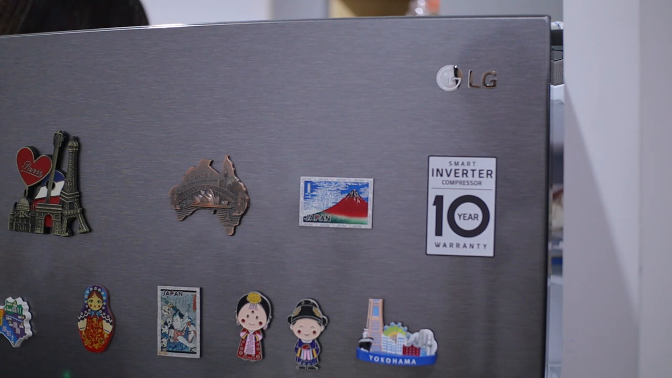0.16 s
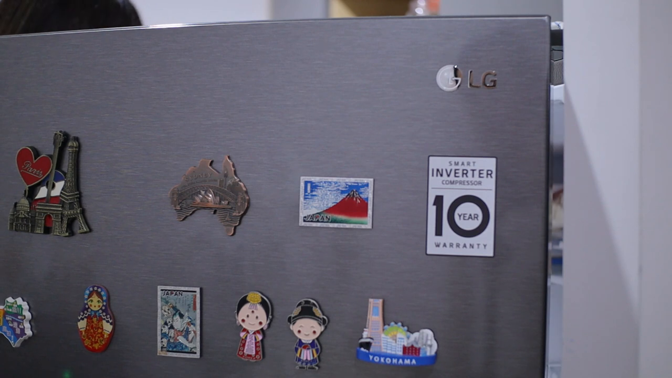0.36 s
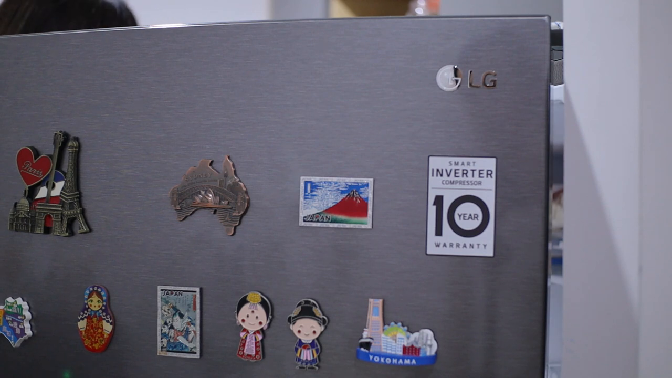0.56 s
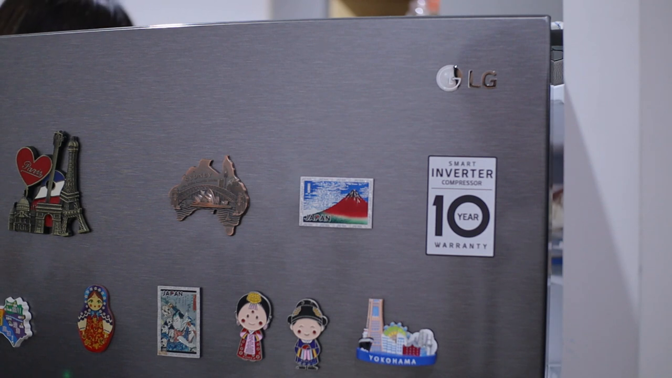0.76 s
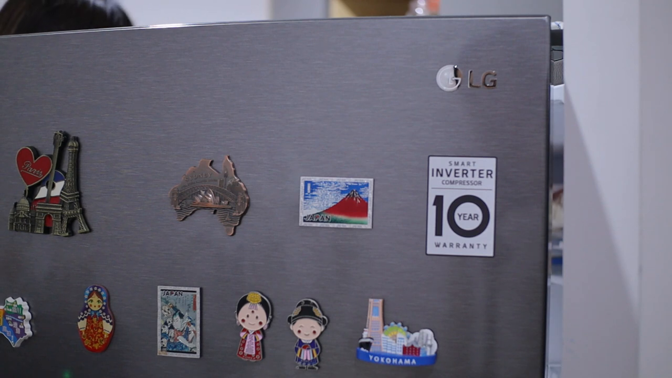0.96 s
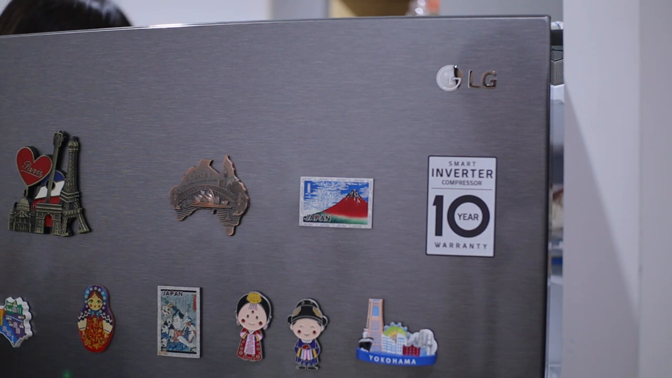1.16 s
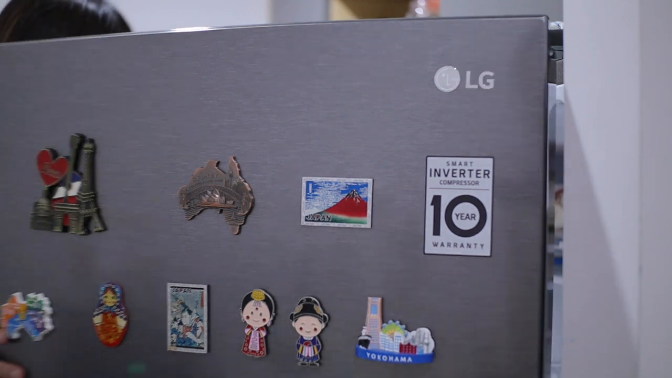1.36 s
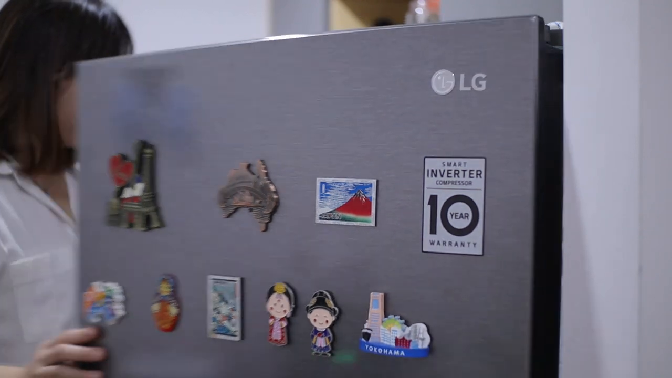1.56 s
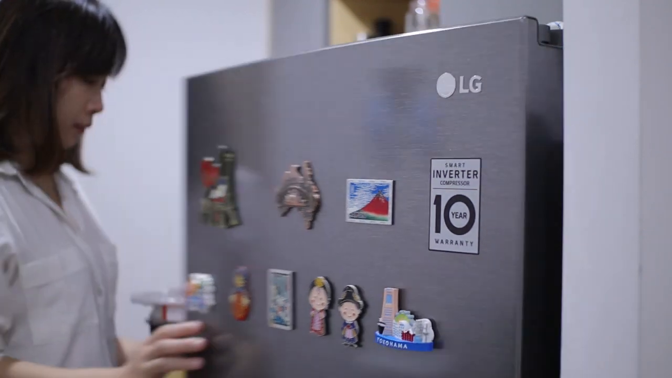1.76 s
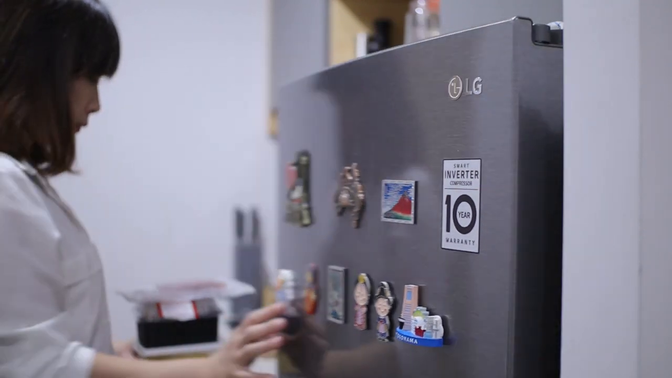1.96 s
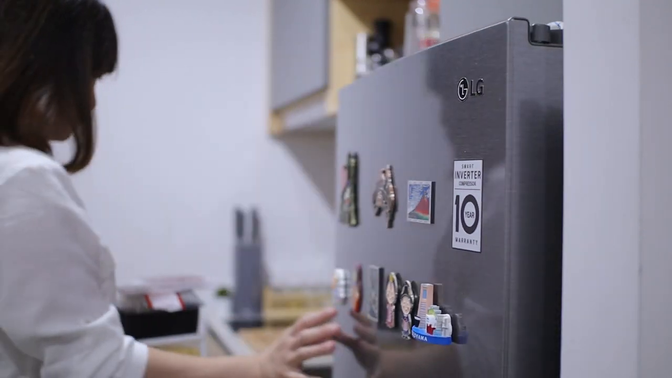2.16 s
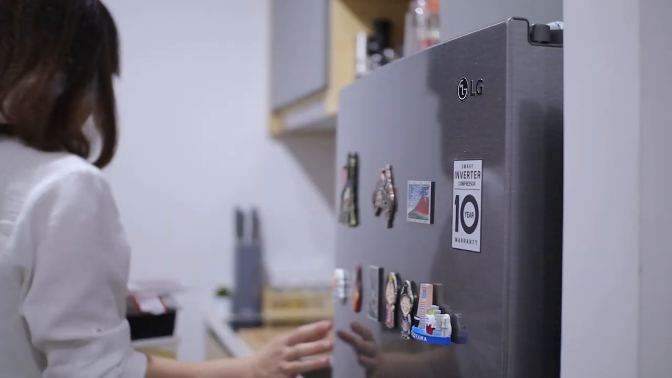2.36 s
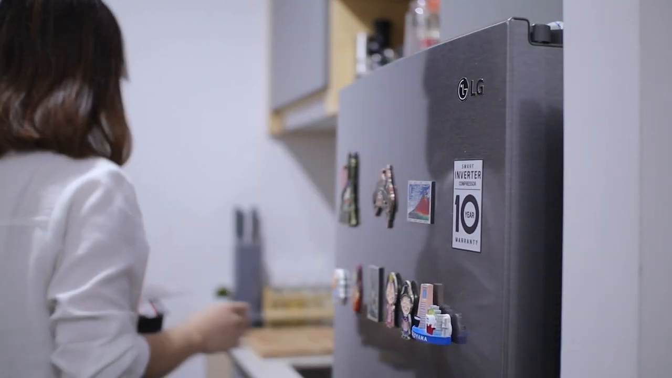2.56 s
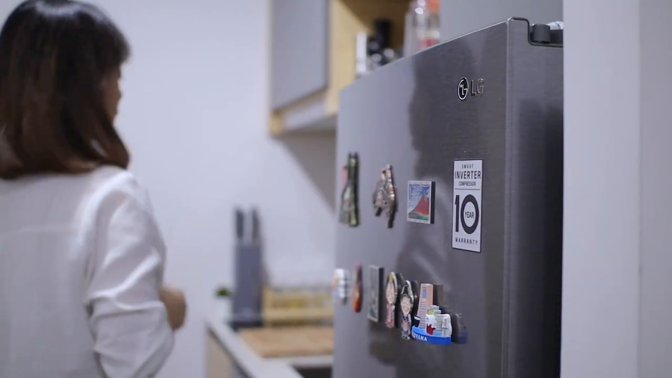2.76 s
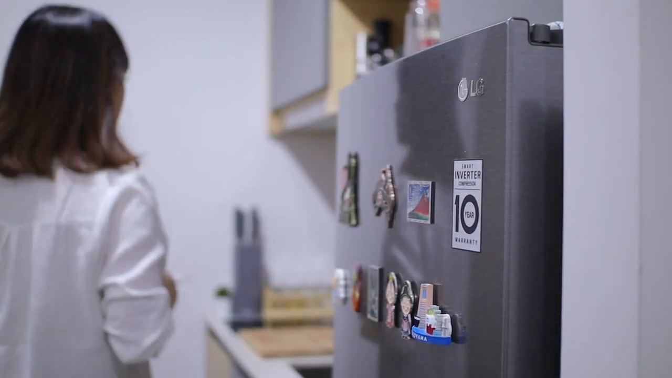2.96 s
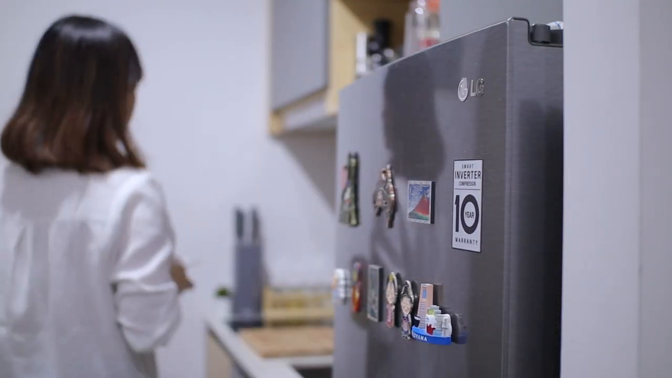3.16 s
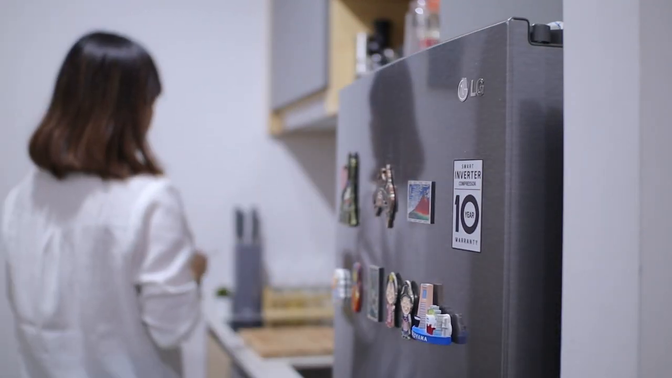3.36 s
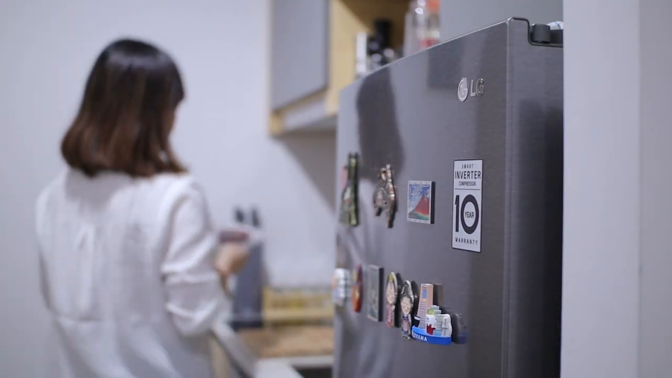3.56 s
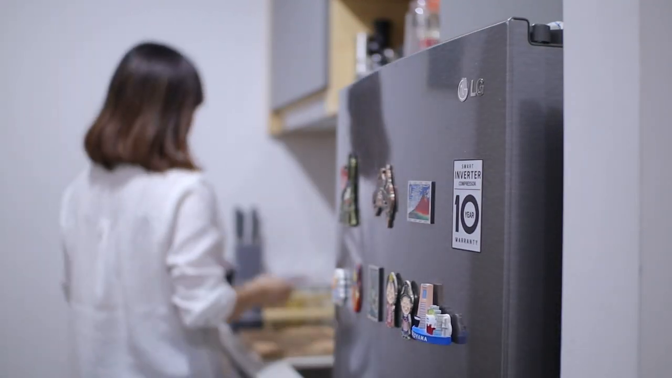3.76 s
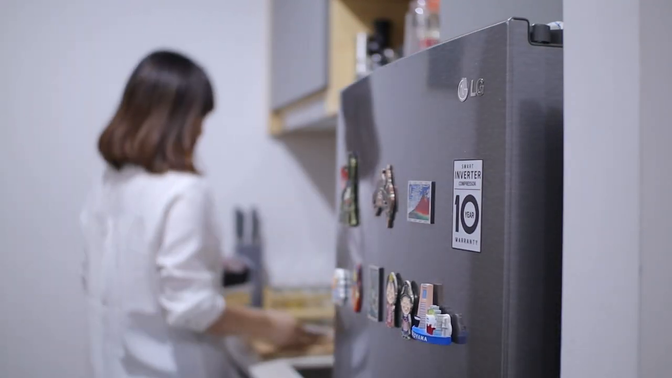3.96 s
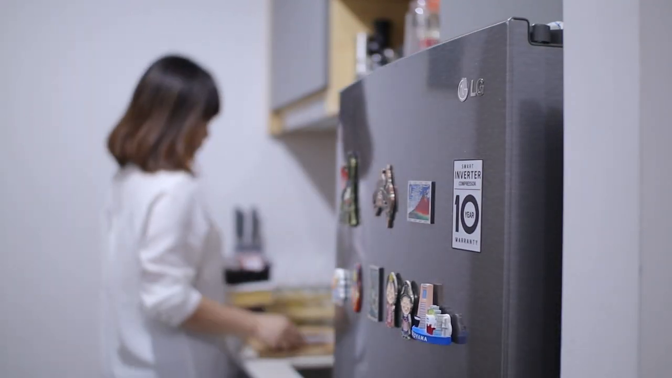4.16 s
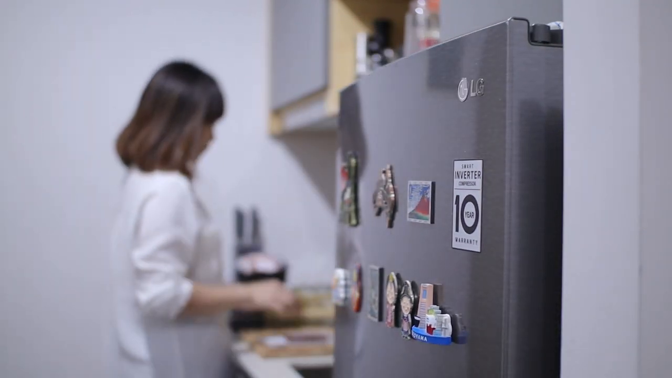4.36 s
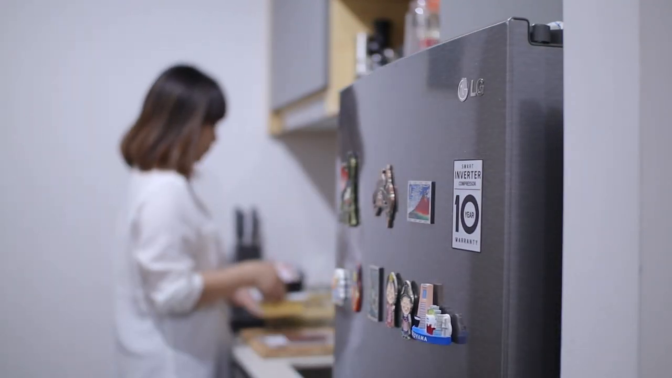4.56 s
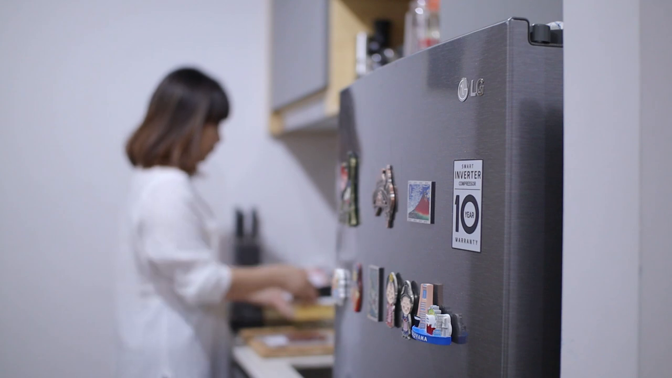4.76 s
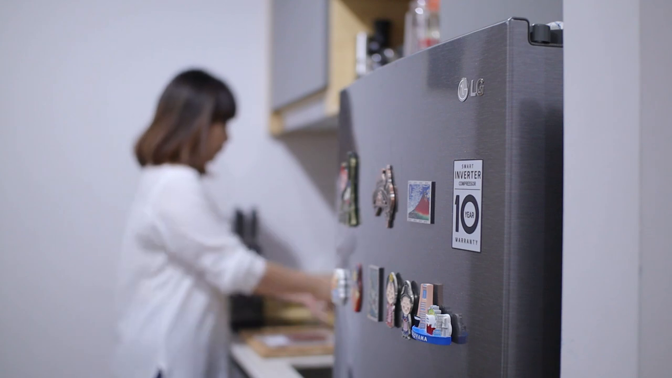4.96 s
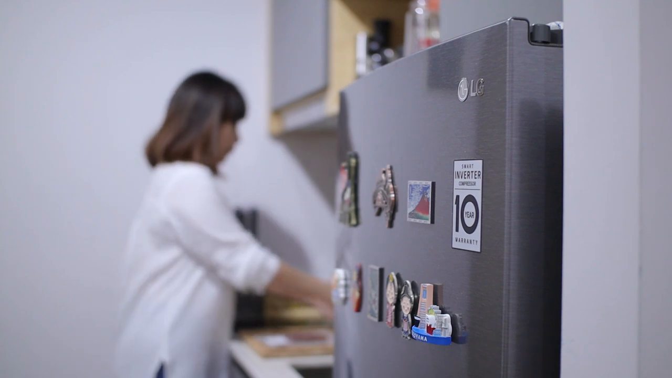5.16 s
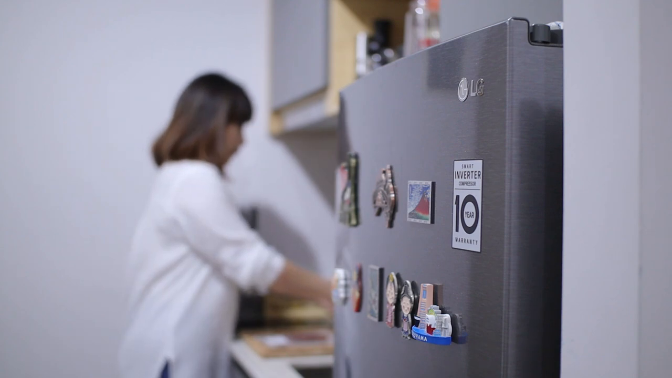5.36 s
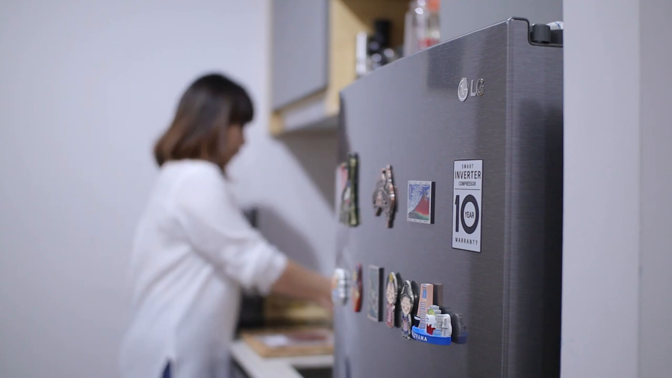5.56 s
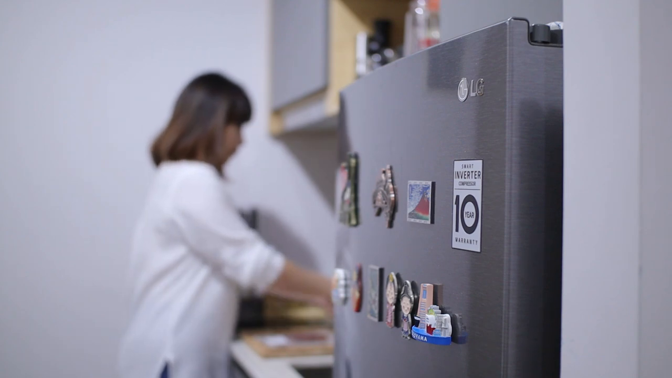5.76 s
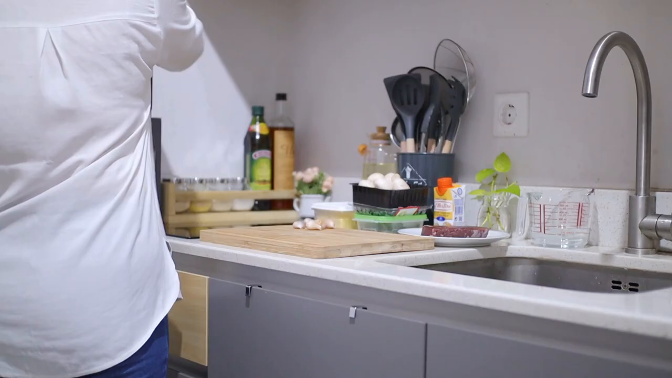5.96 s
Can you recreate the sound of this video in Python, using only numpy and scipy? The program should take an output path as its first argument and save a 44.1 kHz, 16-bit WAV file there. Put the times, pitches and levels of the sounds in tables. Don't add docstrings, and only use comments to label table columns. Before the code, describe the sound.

Over a low compressor hum, tubs knock softly, a fridge door thuds shut, wrappers rustle faintly, and two woody board knocks come near the end.

```python
import sys
import numpy as np
from scipy import signal
from scipy.fft import rfft, irfft, next_fast_len
from scipy.io import wavfile

SR = 44100
rng = np.random.default_rng(int(sys.argv[2]) if len(sys.argv) > 2 else 0)


def pcm_store(signal):
    levels = np.round(np.clip(np.atleast_2d(signal), -1, 1) * 32767)
    wavfile.write(sys.argv[1], SR, levels.astype(np.int16).T)


def gain_from_decibels(decibels):
    exponent = np.asarray(decibels, float) / 20
    return 10 ** exponent


N = 265614
SHORT = 24576


def at_hz(points, hz):
    points = np.array(points)
    return np.interp(np.log(hz + 1), np.log(points[:, 0] + 1), points[:, 1])


def coloured(x, spectrum):
    size = next_fast_len(x.shape[-1] + 8192)
    gain = gain_from_decibels(at_hz(spectrum, np.fft.rfftfreq(size, 1 / SR)))
    cepstrum = irfft(np.log(gain), size)
    cepstrum[1:size // 2] *= 2
    cepstrum[size // 2 + 1:] = 0
    response = np.exp(rfft(cepstrum))
    return irfft(rfft(x, size) * response, size)[..., :x.shape[-1]]


def rms_one(x):
    return x / np.sqrt(np.mean(x ** 2) + 1e-20)


def drift(rate):
    knots = rng.standard_normal(int(N / SR * 40) + 2)
    place = np.arange(N) / SR * min(rate, 39)
    return rms_one(np.interp(place, np.arange(len(knots)), knots))


def ring(clicks, hz, t60):
    r = gain_from_decibels(-60 / (t60 * SR))
    w = 2 * np.pi * hz / SR
    return signal.lfilter([0, np.sin(w)], [1, -2 * r * np.cos(w), r * r], clicks + 1e-18)


def kitchen(x, lean, wet_db, length_s):
    # f/Hz, t60/s
    room_t60 = [(60, 0.27), (250, 0.5), (1000, 0.4), (4000, 0.26), (8000, 0.36), (13000, 0.24)]
    t = np.arange(SHORT * 2 // 3) / SR
    white = rng.standard_normal((3, len(t)))
    edges = 30 * 2. ** np.arange(10)
    tail = 0
    for low, high in zip(edges, np.minimum(edges[1:], .45 * SR)):
        sos = signal.butter(1, [low, high], "band", fs=SR, output="sos")
        band = signal.sosfilt(sos, white[:2])
        tail = tail + band * gain_from_decibels(-60 * t / at_hz(room_t60, np.sqrt(low * high)))
    tail = gain_from_decibels(wet_db) * tail * (1 - np.exp(-t / 0.0068))
    tail *= 1 + 0.6 * np.exp(-t / 0.012)
    direct = 0.14 * white[2] * np.exp(-t / max(length_s, 1e-4))
    direct[0] = 0.32
    tail += direct * [[1], [np.clip(lean, -1, 1)]]
    return signal.oaconvolve(x[None], tail, axes=1)[:, :len(x)]


def add(out, sound, s):
    at = round(s * SR)
    out[:, at:at + SHORT] += sound[:, :N - at]


def contact():
    return signal.unit_impulse(SHORT)


def peaked(sound, db):
    return sound * gain_from_decibels(db - 10) / np.sqrt(np.mean(sound[0, :1300] ** 2))


def door():
    # t/s, peak level/dB, weight/dB
    slam = [
        (2.266, -27, -11),
        (2.2722, -3, -9),
        (2.282, -25, -9),
        (2.2866, -19, 5.5),
        (2.2986, -24, 1),
        (2.312, -20.5, 0),
        (2.350, -35.5, 0),
        (2.367, -27.5, 1),
    ]
    # f/Hz, level/dB per Hz
    slam_colour = [(190, -36), (330, -10.5), (568, -10), (645, -15), (800, -12), (993, -16.5), (1370, -12),
                   (2350, -17.5), (4530, -21.5), (8440, -32.5), (9900, -28), (15000, -58)]
    # f/Hz, level/dB, t60/s
    cabinet = [(26.55, -12.5, 2), (53, -14, 0.67), (76, -0.5, 0.11), (126.5, -12, 0.25), (154, 3, 0.055),
               (231, 3.5, 0.069), (259, -3, 0.11), (290, 2, 0.081), (354, -12, 0.18), (424, -5, 0.15),
               (561, -9, 0.2)]
    push_s = 0.0019
    start_s = slam[0][0]
    clicks, pushes = np.zeros(SHORT), np.zeros(SHORT)
    for s, db, weight_db in slam:
        at = round((s - start_s) * SR)
        clicks[at] = -gain_from_decibels(db)
        pushes[at] = -gain_from_decibels(db + weight_db)
    pushes = signal.lfilter([1], [1, -np.exp(-1 / (push_s * SR))], pushes) / (push_s * SR)
    pushes = signal.lfilter(*signal.butter(1, 45, "high", fs=SR), pushes)
    boom = sum(gain_from_decibels(db) * ring(pushes, hz, t60) for hz, db, t60 in cabinet)
    crack = coloured(clicks, slam_colour)
    out = np.zeros((2, N))
    add(out, gain_from_decibels(21.0) * kitchen(crack, lean=0.14, wet_db=-24, length_s=0.0057), start_s)
    add(out, gain_from_decibels(-1.5) * kitchen(boom, lean=0.41, wet_db=-42.0, length_s=.0001), start_s)
    return out


def knocks():
    # t/s, peak level/dB, contact length/s, lean/-1..1, room level/dB
    set_down = [
        (0.02, -40, 0.0012, 0.41, -17),
        (0.595, -30, 0.0022, 0.23, -18),
        (1.31, -27.5, 0.012, 0.26, -24.5),
        (4.044, -31.5, 0.0026, 0.39, -26.5),
        (5.332, -20, 0.013, 0.21, -21),
        (5.609, -25.5, 0.0099, 0.45, -23),
    ]
    # f/Hz, level/dB per Hz
    knock_colours = [
        [(880, -21), (1500, -10), (1820, -16), (3270, -11), (4460, -4), (5950, -11), (10300, -7), (15000, -29)],
        [(88, -24), (200, -11), (601, -17), (757, -13), (1320, -22), (4500, -28.5), (10400, -38), (15000, -60)],
        [(88, -11), (150, -2), (459, -8), (790, -2), (1100, -15), (2700, -14), (3670, -28), (11200, -34)],
        [(150, -21), (250, 0.5), (919, -1.5), (2900, -3), (4520, -10), (10300, -22.5), (15000, -46)],
        [(150, -20.5), (312, -0.5), (589, -6), (991, -11), (1130, -0.5), (2700, -23), (9820, -35), (13100, -48)],
        [(212, -17), (312, 2.5), (486, -6.5), (714, -1), (936, -21), (1490, -21), (3000, -29), (11500, -33.5)],
    ]
    # (capped at 0.3 s, then damped to 0.24 of that)
    board = [(337, -13, 0.28), (680, -23, 0.38), (860, -0.5, 1.5), (1110, -11, 0.31), (1265, -17, 4),
             (1390, 16.5, 0.025), (1330, -19, 0.33), (1625, -4, 0.23), (1560, -14, 0.25), (2040, -30, 0.54)]
    edge_db = -32
    out = np.zeros((2, N))
    for k, ((s, db, length_s, lean, wet_db), colour) in enumerate(zip(set_down, knock_colours)):
        (low, low_db), (high, high_db) = colour[0], colour[-1]
        below = (low / 2, low_db + edge_db / 4)
        above = (high * 2, high_db + 2 * edge_db)
        sound = rms_one(coloured(contact(), [below, *colour, above]))
        if k >= len(set_down) - 2:
            wood = sum(gain_from_decibels(d) * ring(contact(), hz, 0.24 * min(t60, .3)) for hz, d, t60 in board)
            sound += gain_from_decibels(-1.0) * rms_one(wood)
        add(out, peaked(kitchen(sound, lean, wet_db, length_s), db), s)
    return out


def ticks():
    # t/s, peak level/dB, ring f/Hz
    bright = [(0.545, -63, 9210), (0.7726, -61.5, 8930), (1.5312, -57, 10600), (1.5914, -60.5, 9500),
              (2.9752, -54.5, 5600), (3.049, -54, 9860), (3.1837, -62, 7040), (3.633, -59, 5500),
              (4.1698, -60, 9550), (5.7543, -57, 4700)]
    # t/s, peak level/dB, ring f/Hz
    soft = [(0.314, -58, 3500), (0.373, -60, 3500), (.629, -38.5, 1550), (1.599, -56.5, 2500),
            (1.983, -51, 1650), (2.974, -50.5, 2760), (3.05, -50.5, 2660), (3.189, -54, 1780),
            (3.442, -54.5, 2500), (4.283, -48, 1800), (4.33, -47.5, 1800), (4.63, -44, 1120),
            (4.738, -51, 2580), (5.628, -42, 606), (5.844, -45.5, 1495), (5.915, -53, 1190)]
    # t/s, peak level/dB, ring f/Hz
    hollow = [(1.31, -58, 2480), (1.872, -54.5, 3330), (1.872, -65, 9300), (1.9677, -46, 2230),
              (2.003, -67, 2350), (2.04, -48.5, 830), (4.359, -47, 282), (5.821, -55, 1570),
              (5.878, -47, 2090), (5.885, -41, 830)]
    # t/s, peak level/dB, ring f/Hz
    pings = [
        (0.831, -56.5, 4600),
        (1.309, -35, 1765),
    ]
    # t/s, peak level/dB, ring f/Hz
    thumps = [
        (0.613, -34.5, 287),
        (2.052, -40, 176),
    ]
    # t/s, peak level/dB, ring f/Hz
    blow_thumps = [
        (2.268, -17, 80.5),
        (2.2706, -26, 175),
        (2.281, -20.5, 237),
        (2.2935, -22, 258),
    ]
    # rows, damping (width over pitch), room level/dB; low thumps are near and dry
    kinds = ((bright, 1, -27), (soft, .62, -27), (hollow, 0.19, -27),
             (pings, .07, -33), (thumps + blow_thumps, 0.26, -40))
    out = np.zeros((2, N))
    for rows, damping, wet_db in kinds:
        spread = 1 + np.clip(damping, .02, 3)
        for s, db, hz in rows:
            sos = signal.butter(2, [hz / spread, min(hz * spread, 14000)], "band", fs=SR, output="sos")
            sound = signal.sosfilt(sos, contact())
            heard = kitchen(sound, lean=0.24, wet_db=wet_db, length_s=.004)
            add(out, peaked(heard, db), s)
    return out


def stroke(t, start_s, hold_s):
    grip_db = 420 * (t - start_s)
    let_go_db = 182 * (start_s + hold_s - t)
    return gain_from_decibels(np.minimum(0, np.minimum(grip_db, let_go_db)))


def rustle():
    # start t/s, hold t/s, film crackle level/dB, base scrape level/dB
    strokes = [(0.126, 0.17, -69, -69), (0.356, 0.01, -85, -59), (3.113, 0.16, -72.5, -66),
               (3.331, 0.21, -68.5, -65.5), (3.627, 0.022, -62.5, -65), (4.15, 0.038, -60.5, -55),
               (4.272, 0.072, -74, -79), (4.5, 0.067, -58.5, -64.5), (4.614, 0.015, -58.5, -64),
               (4.7, 0.058, -66, -63), (4.835, 0.21, -72, -67.5), (5.839, 0.017, -64, -51)]
    # f/Hz, level/dB per Hz
    crackle = [(1760, -29), (3000, 0.5), (3670, 3), (4200, 3), (5880, -2.5), (10500, -2), (14000, -26),
               (15000, -61)]
    # f/Hz, level/dB per Hz
    scrape = [(350, -31), (600, -8), (833, -0.5), (1110, -14), (1880, -5), (2150, -7), (2500, -11.5),
              (5000, -26.5), (6500, -59), (11000, -120)]
    t = np.arange(N) / SR
    shapes = np.array([stroke(t, s, hold_s) for s, hold_s, *_ in strokes])
    out = 0
    for column, colour, per_s in ((2, crackle, 2500), (3, scrape, 900)):
        struck = rng.random(N) < per_s / SR
        heights = gain_from_decibels(2.9 * np.minimum(rng.exponential(1, N), 5))
        grains = struck * heights * rng.choice([-1, 1], N)
        flutter = gain_from_decibels(2.2 * drift(35))
        level = gain_from_decibels(np.array(strokes)[:, column]) @ shapes * flutter
        wet = kitchen(coloured(grains, colour) * level, lean=.3, wet_db=-32, length_s=.0001)
        out = out + gain_from_decibels(-1.9) * wet * np.sqrt(np.mean(level ** 2) / np.mean(wet[0] ** 2))
    return out


def fridge_hum():
    # f/Hz, rms level/dB, wobble/dB
    hum = [(49.9, -61.5, 3.5), (99.9, -55, 0.5), (200.4, -70, 5), (253.3, -67, 3.5)]
    # f/Hz, rms level/dB
    drive_whine = [(4339, -81.5), (8700, -101)]
    fan_hz, fan_db, shut_s = 255.4, -58.5, 2.33
    t = np.arange(N) / SR
    lines = 0
    for k, (hz, db, wobble_db) in enumerate(hum):
        level = gain_from_decibels(db + 2.5 + wobble_db * drift(21))
        phase = .5 * drift(9.2) + [[0], [k]]
        lines = lines + level * np.sin(2 * np.pi * hz * t + phase)
    fan = gain_from_decibels(fan_db + 3.5 + 2.1 * drift(24.55)) * np.sin(2 * np.pi * fan_hz * t + 1.55 * drift(30))
    door_open = np.clip((shut_s - t) / 0.78, 0, 1)
    whine = sum(gain_from_decibels(db + 5) * np.sin(2 * np.pi * hz * t + 0.25 * drift(24)) for hz, db in drive_whine)
    return lines + whine + fan * door_open


def room_air():
    # f/Hz, level/dB per Hz
    air_colour = [(15, -9), (25, -14), (53, 3.5), (75, -17), (103, -3), (125, -3), (250, -8), (326, -9),
                  (363, -11), (709, -15), (1120, -21.5), (1210, -22), (3930, -34), (4500, -37.5),
                  (15000, -51.5)]
    air = coloured(rng.standard_normal((2, N)), air_colour)
    air = signal.sosfilt(signal.butter(4, 12300, fs=SR, output="sos"), air)
    return gain_from_decibels(-49.5 - 2.5 + 0.3 * drift(4.9)) * rms_one(air)


def scene():
    # f/Hz, level/dB
    ports = [(60, -90), (110, -38), (200, -32), (380, -11.5), (690, -10), (1280, -4), (2350, 2.5),
             (4330, 4), (7980, 7.5), (14700, 5.5)]
    # f/Hz, level/dB
    air_ports = [(60, -27), (110, -22), (200, -13), (380, -6), (690, -2.5), (1280, 2), (2350, 4.5),
                 (4330, 5.5), (7980, 7.5), (14700, 5)]
    shut = door()
    hands = knocks() + ticks() + rustle()
    near = shut + hands
    far = fridge_hum() + room_air()
    mid = near[0] + far[0]
    side = coloured(near[1], ports) + coloured(far[1] + 0.043 * far[0], air_ports)
    tip = 0.046 * shut[0] + 0.1 * hands[0]
    side += signal.lfilter(*signal.butter(1, 230, "high", fs=SR), tip)
    return np.array([mid + side, mid - side])


def band_limit(x):
    return signal.sosfilt(signal.butter(12, 15310, fs=SR, output="sos"), x)


def record(dry):
    mix = signal.sosfilt(signal.butter(6, 14500, fs=SR, output="sos"), dry)
    return band_limit(mix)


dry = scene()
out = record(dry)
pcm_store(out)
```